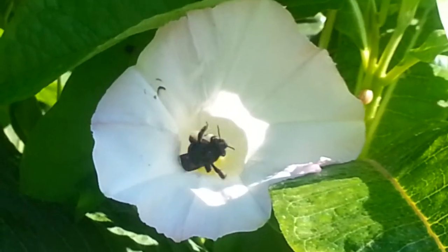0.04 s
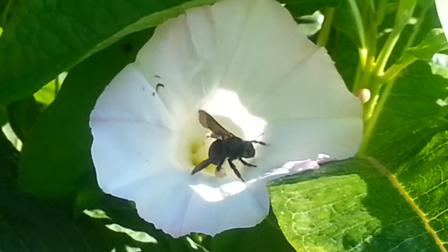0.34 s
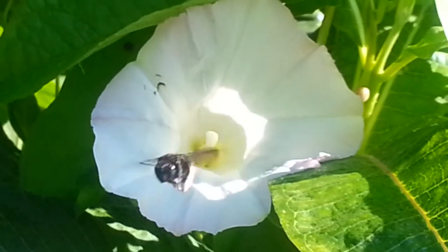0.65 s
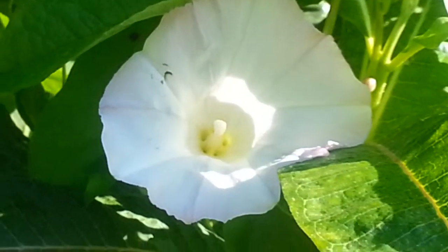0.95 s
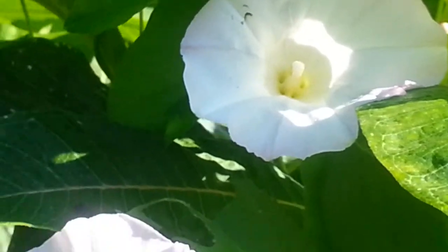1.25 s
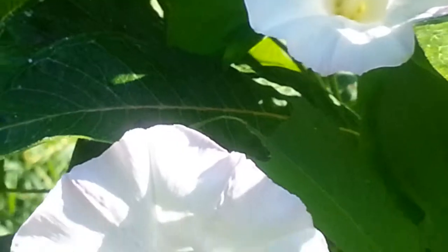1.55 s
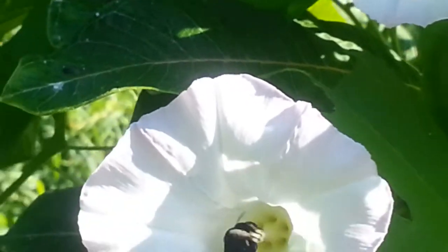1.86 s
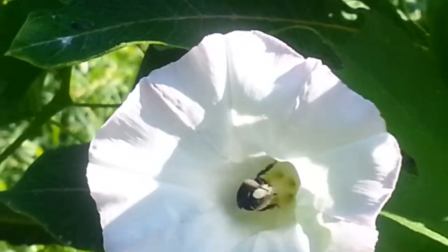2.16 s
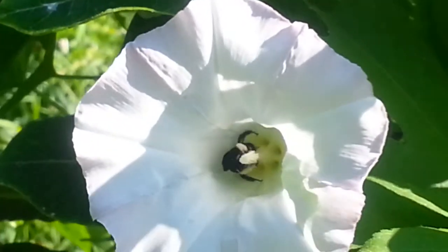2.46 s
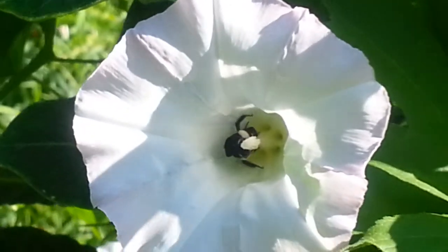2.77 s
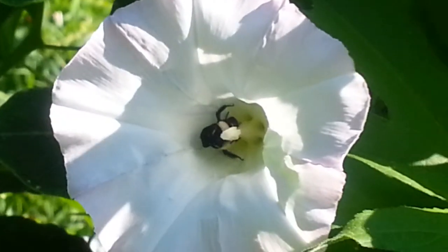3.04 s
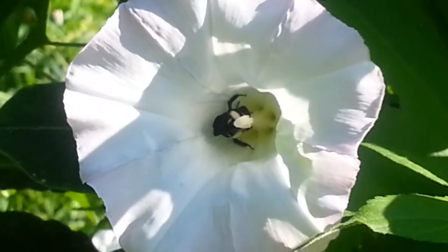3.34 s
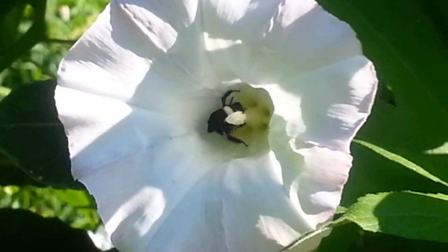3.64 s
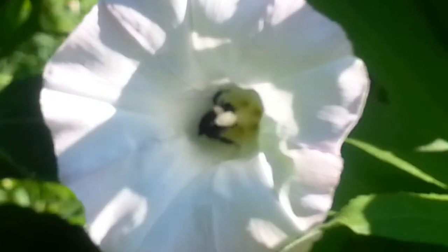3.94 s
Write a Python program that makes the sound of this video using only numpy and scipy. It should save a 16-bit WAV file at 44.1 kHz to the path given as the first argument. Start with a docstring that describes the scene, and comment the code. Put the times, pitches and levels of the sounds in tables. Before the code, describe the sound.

Crickets trill close by in fast, high pulses throughout, mostly on the left, over a hiss of far insects. The loudest pauses from about 1.4 to 2.9 seconds. Faint birds whistle in the first second and a half and near the end, with short chips between. A leaf crackles briefly at 1.4 seconds. A faint distant engine hum and low rumble of air lie underneath.

```python
"""Crickets in a summer garden

Four near crickets trill, one tone pulse per wing stroke, over far insects so dense that they sum
to a hiss. Small birds chip and whistle some way off, and foliage scatters these calls and the
crickets' into short echoes. Leaves brush and one slips close by in dry ticks, while a distant
engine hums its harmonic series in the low rumble of the air."""
import sys
import numpy as np
from scipy import signal
from scipy.fft import rfft, irfft
from scipy.io import wavfile

SR = 44100
rng = np.random.default_rng(int(sys.argv[2]) if len(sys.argv) > 2 else 0)


def wrap_up_sound(samples):
    """Save the sound to the file named by the first command line argument, as 16-bit audio."""
    columns = np.atleast_2d(samples).T
    # keep every value between -1 and 1, then stretch to whole-number steps
    tamed = np.clip(columns, -1, 1)
    steps = np.round(tamed * 32767).astype(np.int16)
    wavfile.write(sys.argv[1], SR, steps)


N = 176400
T = np.arange(N) / SR
HZ = np.maximum(np.fft.rfftfreq(N, 1 / SR), 1)


def from_db(db):
    """Amplitude ratio: a factor of ten per 20 dB."""
    return 10 ** (np.asarray(db) / 20)


def unit_rms(x):
    """Normalisation to unit mean power."""
    return x / np.sqrt(np.mean(x ** 2) + 1e-20)


def envelope(rows):
    """Gain interpolated in decibels between (t/s, level/dB) points."""
    return from_db(np.interp(T, *np.transpose(rows)))


def spectrum(rows):
    """A table's columns interpolated over log frequency."""
    hz, *columns = np.transpose(rows)
    return np.array([np.interp(np.log(HZ), np.log(hz), column) for column in columns])


def pan(db):
    """Interaural level difference at constant power; positive is left."""
    return unit_rms(from_db([[db / 2], [-db / 2]]))


def drift(rate_hz):
    """Random modulation: low-passed Gaussian noise of unit rms."""
    return unit_rms(irfft(rfft(rng.standard_normal(N)) / (1 + (HZ / rate_hz) ** 4), N))


def flutter(rate_hz):
    """Complex modulation: random amplitude and phase broaden a tone into a band."""
    return (drift(rate_hz) + 1j * drift(rate_hz)) / np.sqrt(2)


def stereo_noise(density_db, correlation=0):
    """Partly coherent noise: the balance of mid and side sets the interaural correlation."""
    mid, side = rfft(rng.standard_normal((2, N)))
    ears = np.sqrt(1 + correlation) * mid + np.sqrt(1 - correlation) * side * [[1], [-1]]
    return irfft(from_db(density_db) * ears, N) * np.sqrt(SR) / 2


def add_note(out, start, length, pitches, db, pan_db, grain, roughness):
    """Frequency glide through three pitches under a half-sine envelope, roughened by modulation."""
    i = np.arange(max(int(start * SR), 0), min(int((start + length) * SR), N))
    progress = np.clip((i / SR - start) / length, 0, 1)
    hz = np.polyval(np.polyfit([0, .5, 1], pitches, 2), progress)
    carrier = np.exp(2j * np.pi * (np.cumsum(hz) / SR + rng.random()))
    tone = np.real(carrier * (np.sqrt(1 - roughness ** 2) + roughness * grain[i]))
    out[:, i] += pan(pan_db) * from_db(db) * np.sin(np.pi * progress) * tone * np.sqrt(2)


def foliage(sound, echo_db, t60_s=.28):
    """Multiple scattering: leaves add a diffuse, exponentially decaying tail to each call."""
    t = T[:SR // 2]
    tails = rng.standard_normal((2, len(t))) * from_db(-60 * t / t60_s)
    tails /= np.sqrt(np.sum(tails ** 2, axis=1, keepdims=True))
    return sound + from_db(echo_db) * signal.fftconvolve(sound, tails, axes=1)[:, :N]


# Spectral density of the far insects: f/Hz, left/dB, right/dB
CHORUS_SPECTRUM = [(2920, -110, -120), (3870, -91, -91), (4120, -82, -92), (4870, -78.5, -86.5),
                   (5660, -68.5, -85.5), (5860, -61.5, -77), (6360, -66.5, -69.5), (7090, -71.5, -66),
                   (7260, -75, -75.5), (7810, -79.5, -70.5), (8520, -88, -81), (9100, -87.5, -87.5),
                   (9720, -104, -93.5), (12500, -100, -96.5), (14700, -108, -100)]
# Their swell: t/s, gain/dB
CHORUS_SWELL = [(0, -1), (.7, -0.5), (1.4, 0), (2.2, -2), (3, -1.5), (4, -1)]


def insect_chorus():
    """Incoherent summation: countless far insects blend into a hiss that flickers in each ear."""
    flicker_db = np.array([drift(50), drift(37)])
    return stereo_noise(spectrum(CHORUS_SPECTRUM)) * envelope(CHORUS_SWELL) * from_db(flicker_db)


# Spectral density of moving air: f/Hz, left/dB, right/dB, interaural correlation
AIR_SPECTRUM = [(15, -100, -100, .3), (30, -103, -84, .3), (59, -73.5, -87.5, 0.14), (97, -83.5, -72, 0.77),
                (114, -86, -87.5, 0.91), (168, -78, -77.5, 0.81), (274, -77.5, -77, 0.71),
                (383, -84.5, -81, 0.029), (506, -87.5, -91.5, 0.34), (660, -87.5, -89.5, 0.42),
                (1000, -90.5, -90, -0.29), (1530, -94.5, -99, 0.11), (2230, -95.5, -102, -0.28),
                (2780, -94.5, -106, 0.42), (3650, -90.5, -106, -0.43), (7000, -120, -120, -0.36)]
# Its swell: t/s, gain/dB
AIR_SWELL = [(0, 1), (.75, 1.5), (1.3, 1.5), (1.8, -1.5), (3, 0), (4, -1)]


def air_rumble():
    """Broadband noise of moving air, densest at low frequencies."""
    left_db, right_db, correlation = spectrum(AIR_SPECTRUM)
    return stereo_noise([left_db, right_db], correlation) * envelope(AIR_SWELL)


# Engine harmonics: harmonic number, level/dB before the swell
ENGINE_HARMONICS = [(1, -78), (3, -60), (4, -63), (6, -81), (8, -78.5), (10, -92), (12, -82)]
# Swell of the hum: t/s, gain/dB
ENGINE_SWELL = [(0, -3), (.8, 4), (1.4, 1.5), (2, 0.5), (3, -5.5), (4, -0.5)]


def engine(fundamental_hz=88.8, drone_hz=288, drone_db=-64):
    """Harmonic series of a far engine, plus a drone; each partial fades in and out on its way."""
    wandering_time = np.cumsum(1 + .002 * drift(1.37)) / SR
    partials = [(k * fundamental_hz, db) for k, db in ENGINE_HARMONICS] + [(drone_hz, drone_db)]
    hum = np.zeros(N)
    for hz, db in partials:
        fading = 1 + .28 * drift(9.7)
        hum += from_db(db) * fading * np.sin(2 * np.pi * (hz * wandering_time + rng.random()))
    return np.sqrt(2) * hum * envelope(ENGINE_SWELL) * pan(-1.5)


# Stirring of the vines: t/s, level/dB
BREEZE_LEVEL = [(0, -73.5), (.65, -63), (1.15, -74), (1.8, -74), (2.4, -63), (2.9, -64), (3.3, -71.5),
                (3.65, -68), (3.85, -63), (4, -89)]


def breeze(centre_hz=1920, half_width_octaves=.34):
    """Band-limited noise: a faint hush comes and goes in the vines."""
    band_db = -10 * np.log10(1 + (np.log2(HZ / centre_hz) / half_width_octaves) ** 6)
    return unit_rms(stereo_noise(band_db)) * envelope(BREEZE_LEVEL) * pan(-2.5)


def trill(times, stroke_s, peak_hz, rise_hz, fall_hz, db, pan_db):
    """Stridulation: each wing stroke is a slightly rough tone whose pitch arches up and falls away."""
    out, grain = np.zeros((2, N)), flutter(rate_hz=175)
    for t in times:
        top_hz = rng.normal(peak_hz, 20.4)
        pitches = (top_hz - rise_hz, top_hz, top_hz - fall_hz)
        stroke_db = rng.normal(db, .63)
        add_note(out, t - stroke_s / 2, stroke_s, pitches, stroke_db, pan_db, grain, roughness=.38)
    return out


# Voices, by cricket: stroke length/ms, pitch rise/Hz, pitch fall/Hz, level/dB, pan/dB
CRICKET_VOICES = {"lead": (29, 192, 457, -32, 27), "low": (38, 241, 235, -33.5, 16.5),
                  "high": (26, 254, 250, -46.5, 6), "right": (30, 284, 287, -41.5, -16)}
# Trills: cricket, first stroke t/s, last stroke t/s, stroke count, peak f/Hz, gain/dB
NEAR_TRILLS = [("lead", .014, .541, 7, 6370, 0), ("lead", .631, 1.158, 7, 6360, .5),
               ("lead", 1.252, 1.356, 2, 6360, 0), ("lead", 2.870, 3.472, 8, 6250, -1),
               ("lead", 3.564, 3.922, 5, 6335, -1), ("low", .013, 1.375, 17, 6015, 0),
               ("low", 1.462, 1.977, 7, 6005, -2), ("low", 2.059, 2.312, 4, 5995, 0),
               ("low", 2.402, 2.909, 7, 5995, -2.5), ("low", 2.995, 3.958, 12, 6000, -3.5),
               ("high", .061, 1.959, 28, 7235, 0), ("high", 2.169, 3.932, 26, 7215, -1),
               ("right", .048, .896, 12, 7080, -1), ("right", 1.122, 2.548, 19, 7080, 0),
               ("right", 3.055, 3.97, 13, 7085, 1)]


def near_crickets():
    """Periodic pulse trains: four crickets sing runs of evenly spaced wing strokes."""
    out = np.zeros((2, N))
    for name, first, last, strokes, hz, effort_db in NEAR_TRILLS:
        stroke_ms, rise_hz, fall_hz, db, pan_db = CRICKET_VOICES[name]
        times = np.linspace(first, last, strokes)
        out += trill(times, stroke_ms / 1000, hz, rise_hz, fall_hz, db + effort_db, pan_db)
    return out


# Distant trills: start t/s, end t/s, peak f/Hz, stroke rate/Hz, relative level/dB, pan/dB
FAR_TRILLS = [(0, 4, 5830, 15, -50, 16), (0, 1.9, 8130, 13.4, -48, -20), (1.9, 4, 8000, 13, -51, -17),
              (2.2, 4, 7195, 21, -45, -18), (2.4, 3.3, 8510, 22, -54, -3)]


def far_crickets(gain_db=-3.5):
    """Unsynchronised pulse trains: crickets further off each keep their own rate and phase."""
    out = np.zeros((2, N))
    for start, end, hz, rate, db, pan_db in FAR_TRILLS:
        times = np.arange(start + rng.random() / rate, end, 1 / rate)
        out += trill(times, .036, hz, rise_hz=150, fall_hz=150, db=db + gain_db, pan_db=pan_db)
    return out


# Far song: onset t/s, length/s, start, middle and end f/Hz, relative level/dB, pan/dB, roughness
SONG_NOTES = [(.12, .66, 4200, 4270, 4220, -61, 2, .95), (.33, .12, 4560, 4600, 4540, -58, 6, .7),
              (.43, .27, 4700, 4860, 4680, -59, 0, .6), (.65, .06, 4620, 4520, 4380, -57, 0, .4),
              (.72, .14, 4520, 4630, 4600, -55.5, 0, .6), (.9, .06, 4600, 4560, 4500, -58, 0, .6),
              (1.15, .14, 4300, 3780, 3620, -55, 9, .88), (1.24, .2, 3540, 3500, 3530, -59, 11, .88),
              (3.03, .18, 4200, 4280, 4220, -59.5, 3, .95), (3.7, .08, 4300, 4600, 4950, -56, -6, .3),
              (3.74, .24, 4080, 4340, 4560, -53, -2, .75), (.56, .1, 2300, 2050, 1800, -68, -12, 1),
              (.69, .08, 1950, 2200, 2050, -70, -10, 1), (1.56, .04, 3000, 3400, 3800, -65, 12, .9),
              (2.89, .035, 2900, 3250, 3600, -64, 12, .9)]


def bird_whistles(gain_db=3):
    """Frequency modulation: far birds sing thin, rough, gliding notes."""
    out, grain = np.zeros((2, N)), flutter(rate_hz=180)
    for t, length, *pitches, db, pan_db, roughness in SONG_NOTES:
        add_note(out, t, length, pitches, db + gain_db, pan_db, grain, roughness)
    return out


# A bird's chips: centre t/s, level/dB
CHIP_CALLS = [(0.292, -51), (.342, -51.5), (1.701, -54), (2.093, -61), (2.147, -52.5), (2.467, -50),
              (2.521, -51), (2.85, -51), (2.903, -51), (3.187, -50), (3.24, -52), (3.517, -49.5),
              (3.567, -50.5)]


def bird_chips(length_s=.03, pitches_hz=(4644, 4536, 3600)):
    """Fast downward sweeps of a nearly pure tone are heard as chips, mostly in pairs."""
    out, grain = np.zeros((2, N)), flutter(rate_hz=180)
    for t, db in CHIP_CALLS:
        add_note(out, t - length_s / 2, length_s, pitches_hz, db, pan_db=0, grain=grain, roughness=.15)
    return out


# Leaves brushing: centre t/s, Gaussian width/s, level/dB, pan/dB
LEAF_BRUSHES = [(.54, 0.005, -48, -1), (.63, 0.081, -53.5, 2), (.9, 0.092, -57, 7),
                (1.415, 0.035, -45.5, 7), (3.95, .11, -47, -3.5)]
# Slips of the near leaf: t/s, relative level/dB
LEAF_TICKS = [(1.401, -28), (1.4075, -29), (1.415, -22), (1.4225, -27), (1.4293, -35), (1.433, -24)]
# Timbre of the leaf noise: f/Hz, relative level/dB
LEAF_SPECTRUM = [(800, -27), (2000, 2.5), (2700, 1.5), (4000, 9.5), (6000, 6), (9000, 8), (11000, 2.5),
                 (14500, -6)]


def leaves(tick_decay_s=.0007, ring_hz=3950, ring_s=.0005, tick_pan_db=6):
    """Friction: brushing makes grainy noise, and each slip is a tick that excites a damped resonance."""
    brush = sum(pan(pan_db) * from_db(db) * np.exp(-.5 * ((T - t) / width) ** 2)
                for t, width, db, pan_db in LEAF_BRUSHES)
    brush *= from_db(1.8 * drift(250))
    ticks, rings = np.zeros((2, N))
    for t, db in LEAF_TICKS:
        age = np.maximum(T - t, 0)
        ticks += from_db(db - 10) * (age > 0) * np.exp(-age / tick_decay_s)
        ring_shape = age / ring_s * np.exp(1 - age / ring_s)
        rings += from_db(db - 12.5) * ring_shape * np.sin(2 * np.pi * ring_hz * age)
    scrape = (brush + ticks * pan(tick_pan_db)) * rng.standard_normal((2, N))
    timbre = unit_rms(from_db(spectrum(LEAF_SPECTRUM)))
    return irfft(rfft(scrape) * timbre, N) + rings * pan(tick_pan_db)


# Puffs of wind: centre t/s, level/dB
WIND_PUFFS = [(.75, -54), (.98, -51), (2.87, -63), (3.06, -51), (3.58, -55.5)]


def wind_puffs(width_s=.034, low_hz=40, high_hz=110):
    """Pressure fluctuation: wind on the microphone makes brief swells of low noise."""
    swell = sum(from_db(db) * np.exp(-.5 * ((T - t) / width_s) ** 2) for t, db in WIND_PUFFS)
    band_db = -10 * np.log10((1 + (HZ / high_hz) ** 4) * (1 + (low_hz / HZ) ** 4))
    return swell * unit_rms(stereo_noise(band_db, correlation=.39))


def slow_chirps(start_s=1.815, period_s=.437, length_s=.19, hz=7400):
    """Narrowband noise in periodic bursts: one more cricket chirps buzzily on the right."""
    out, grain = np.zeros((2, N)), flutter(rate_hz=175)
    for t in np.arange(start_s, T[-1], period_s):
        add_note(out, t, length_s, [hz] * 3, db=-48, pan_db=-23, grain=grain, roughness=1)
    return out


def high_buzz(start_s=2.44, length_s=.34, hz=11780):
    """Roughness from fast random modulation: one insect gives a thin, very high note."""
    out, grain = np.zeros((2, N)), flutter(rate_hz=230)
    add_note(out, start_s, length_s, [hz] * 3, db=-64, pan_db=-16, grain=grain, roughness=1)
    return out


def scene():
    """Superposition of all sources; the far song has the largest share of echo."""
    background = insect_chorus() + air_rumble() + wind_puffs() + engine() + breeze() + leaves()
    crickets = foliage(near_crickets() + far_crickets() + slow_chirps(), echo_db=-15.5)
    birds = foliage(bird_whistles(), echo_db=.5) + foliage(bird_chips(), echo_db=-1)
    return background + crickets + birds + high_buzz()


def record(dry):
    """Band limiting: an elliptic low-pass cuts steeply above 14.5 kHz."""
    return signal.sosfilt(signal.ellip(10, .1, 80, 14500, fs=SR, output="sos"), dry)


dry = scene()
out = record(dry)
wrap_up_sound(out)
```